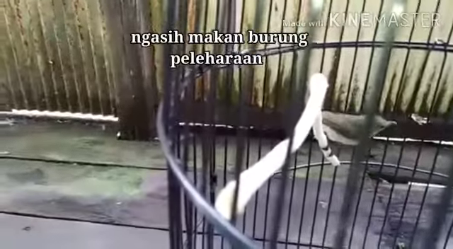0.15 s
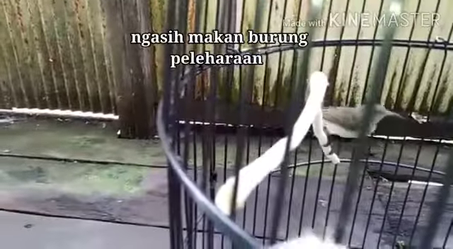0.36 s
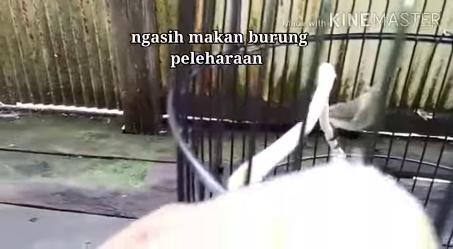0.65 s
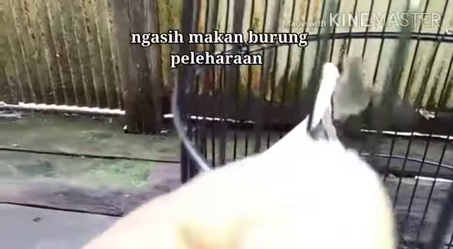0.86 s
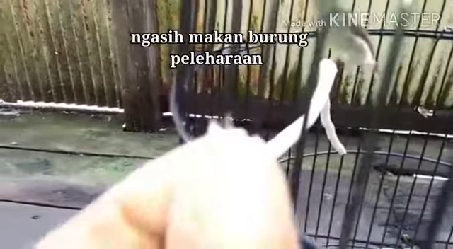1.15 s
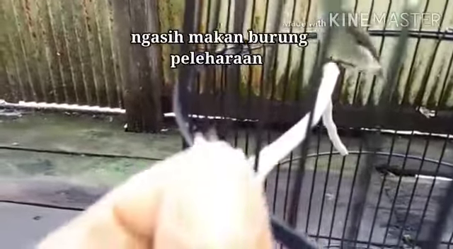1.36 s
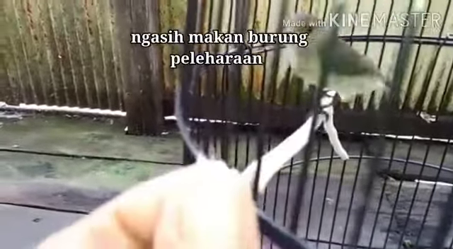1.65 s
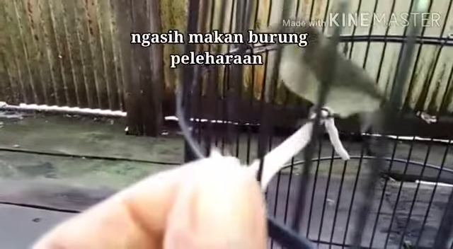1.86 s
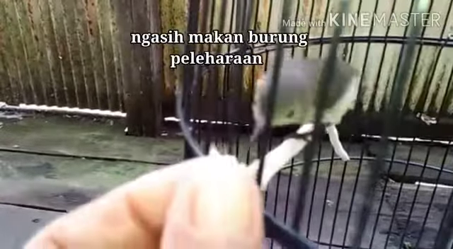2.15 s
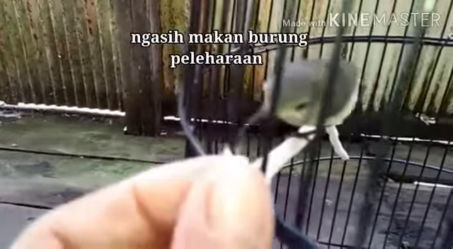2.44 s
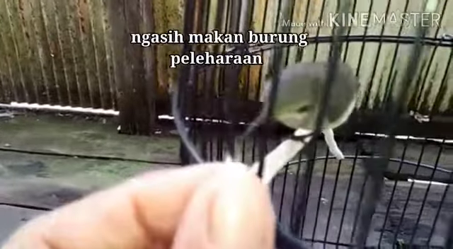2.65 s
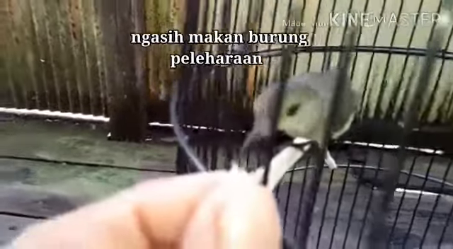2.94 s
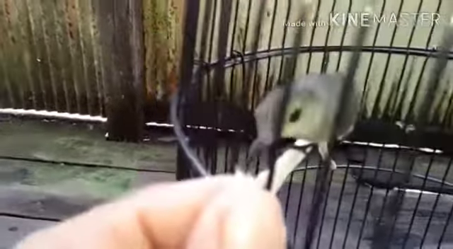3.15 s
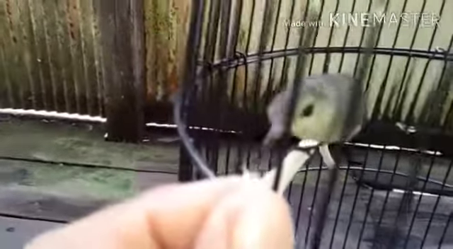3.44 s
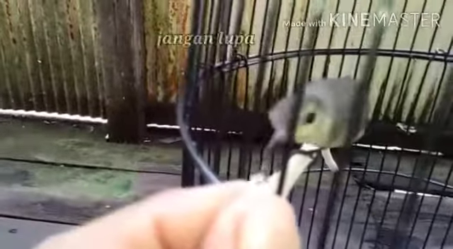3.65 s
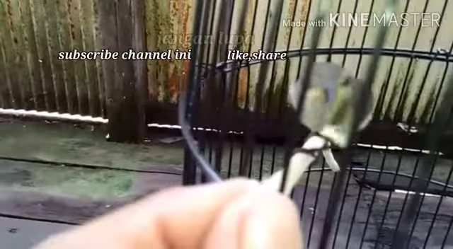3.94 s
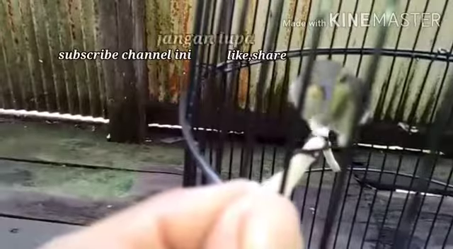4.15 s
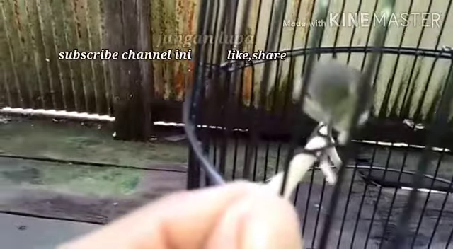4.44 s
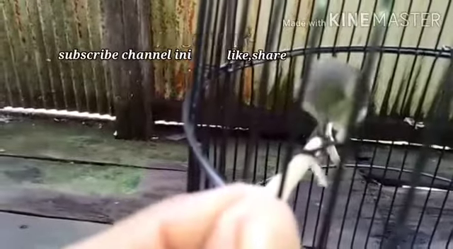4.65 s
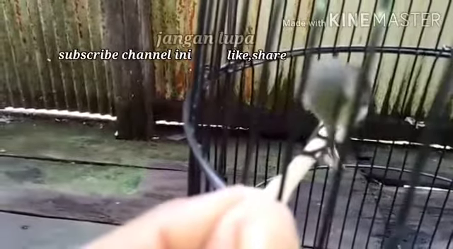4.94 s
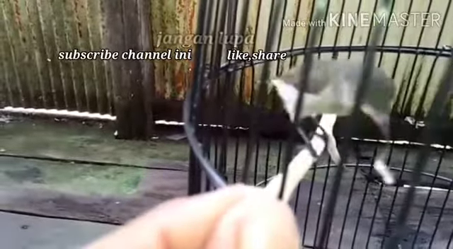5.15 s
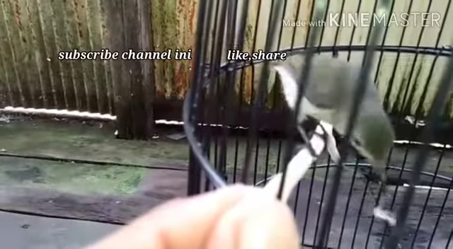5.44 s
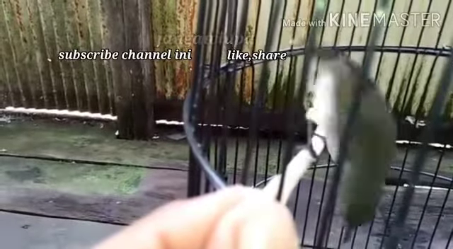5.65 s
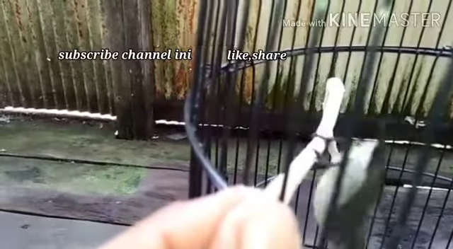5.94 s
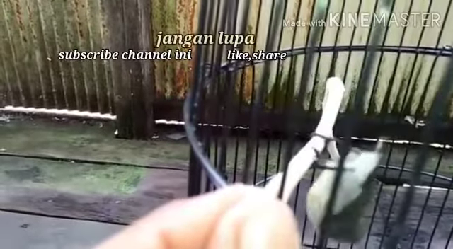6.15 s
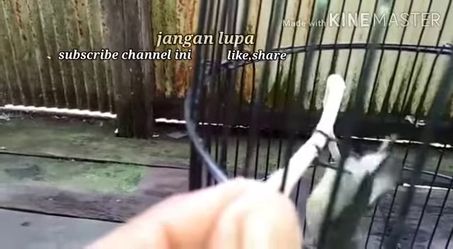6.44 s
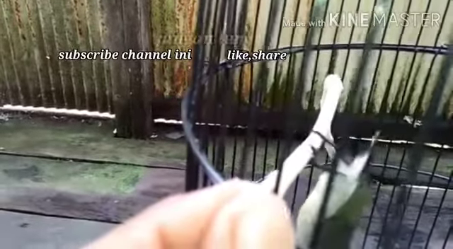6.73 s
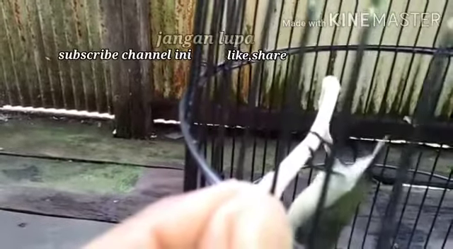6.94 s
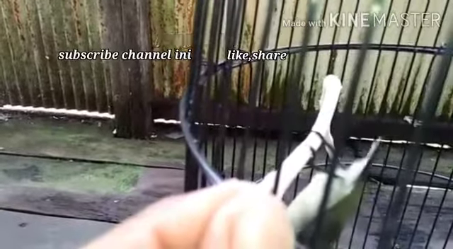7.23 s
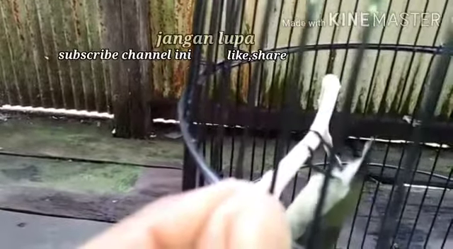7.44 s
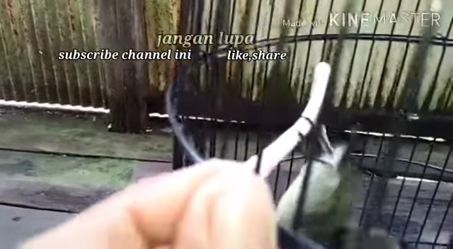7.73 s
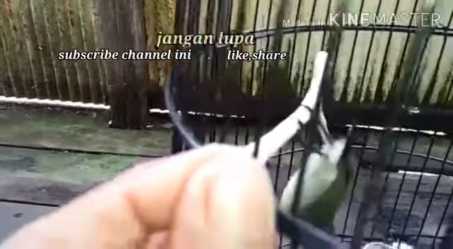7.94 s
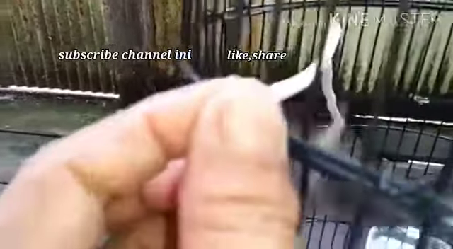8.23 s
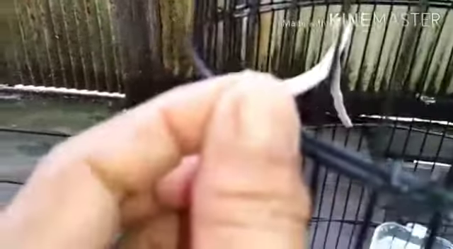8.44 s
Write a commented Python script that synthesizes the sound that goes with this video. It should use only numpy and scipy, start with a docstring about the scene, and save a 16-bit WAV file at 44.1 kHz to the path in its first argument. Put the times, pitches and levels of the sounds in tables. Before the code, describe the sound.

A small close bird gives sharp, very high chips and quick double ticks over faint street rumble, with an engine puttering by late.

```python
"""Caged songbird on a walled porch

A close bird gives harsh chips (arched tones with hiss), pure double ticks, nasal cheeps (throat-filtered
overtones), two-voiced cheeps (sum tones) and a thin held squeak; its hops are scratches of noise. Warbling
whistles, mostly of birds further off, and a few plain cheeps sound over a street of coloured noise and a whirr
that sinks in pitch; dull low bumps thud now and then. Late on an engine, a slowing train of pops ringing an
exhaust, putters by."""
import sys
import numpy as np
from scipy import signal
from scipy.fft import rfft, irfft
from scipy.io import wavfile

SR = 44100
rng = np.random.default_rng(int(sys.argv[2]) if len(sys.argv) > 2 else 0)


def file_out(sig):
    """Save sig as 16-bit WAV at sys.argv[1]."""
    # one column per channel
    cols = np.atleast_2d(sig).T
    # limit, then scale
    lim = np.clip(cols, -1, 1)
    pcm = np.round(lim * 32767).astype(np.int16)
    wavfile.write(sys.argv[1], SR, pcm)


N = 378378
TIME = np.arange(N) / SR   # seconds

# Levels in the tables are relative within each source.
# Street traffic. Each row: time in seconds, level in dB.
STREET_LEVEL = [(0, -70.5), (7.84, -60.5), (8.58, -64.5)]
# Colours of the low rumble, the traffic wash and the faint hiss. Each row: frequency in Hz, gain in dB.
RUMBLE_COLOUR = [(24, -6.5), (80, 2), (160, -6.5), (230, -18.5)]
TRAFFIC_COLOUR = [(200, -15.5), (287, 1.5), (360, -13), (420, -0.5), (600, -7), (960, -0.5), (1300, -7.5),
                  (1650, -5), (3000, -13)]
HISS_COLOUR = [(2500, 0.5), (4500, -10.5), (7000, -4), (9000, 2.5), (14500, -15)]
# Dull bumps. Each row: start in seconds, level in dB.
BUMP_EVENTS = [(5.039, -46), (5.138, -41.5), (5.328, -43), (6.818, -39.5)]
# Engine. Each row: time in seconds, firings per second, level in dB.
ENGINE_COURSE = [(3.9, 35, -70), (4.3, 35, -62), (6.2, 33, -59.5), (6.72, 28.8, -46.5), (7.15, 27.3, -51),
                 (7.75, 26.2, -56), (8.2, 23.7, -60), (8.58, 23, -53)]
# Exhaust resonances. Each row: frequency in Hz, width in Hz, gain in dB.
EXHAUST_MODES = [(68.4, 8.3, 3.5), (119, 17, 9.5), (165, 20, 1.5), (266, 33, -6.5)]
# Whistles, mostly of birds further off, with a few plain, weakly overtoned cheeps. Each row: start in
# seconds, length in seconds, middle pitch in Hz, fall in octaves (negative rises), level in dB.
WHISTLE_CALLS = [(1.194, 0.02, 4850, .03, -53), (1.78, 0.73, 3050, 0.2, -59), (1.89, .11, 4360, -.28, -52),
                 (2.09, 0.19, 1094, 0.12, -53.5), (2.382, 0.21, 2900, 0.63, -51),
                 (3.032, 0.079, 2160, 0.047, -47), (3.444, 0.18, 1187, -0.18, -52),
                 (3.582, 0.065, 2520, 0.25, -50.5), (3.681, 0.049, 5400, 0.55, -58.5),
                 (3.819, 0.1, 2910, -0.099, -49), (4.03, 0.15, 1902, -0.15, -51),
                 (4.076, 0.23, 2524, -0.16, -49.5), (4.148, .62, 1118, -.25, -57.5),
                 (4.882, .22, 1089, 0.089, -48.5), (4.984, 0.0583, 2978, 0.08, -34),
                 (5.057, .1, 5470, -0.034, -52), (6.987, 0.61, 1639, 0.032, -51.5),
                 (7.245, 0.1, 3350, 0.28, -53.5)]
# Feet and beak on perch and wires. Each row: time in seconds, level in dB.
TAP_EVENTS = [(1.584, -49.5), (1.754, -42), (1.849, -41.5), (1.945, -38), (2.728, -50), (3.797, -59),
              (4.161, -31), (5.706, -40.5), (6.447, -58), (6.746, -43), (7.167, -44)]
# Colour of those taps. Each row: frequency in Hz, gain in dB.
TAP_SPECTRUM = [(1700, -12.5), (2200, -0.5), (3600, -4.5), (5500, -0.5), (8600, 6.5), (13000, -10)]
# Partials of the squeak. Each row: frequency in Hz, level in dB.
SQUEAK_PARTIALS = [(9500, -4), (8300, -11.5), (13750, -13)]
# Resonance of throat and open beak. Each row: frequency in Hz, gain in dB.
THROAT_COLOUR = [(2000, -22.5), (3500, -9), (4600, -10), (6800, -1.5), (9000, 6.5), (11200, -10.5),
                 (14000, -16)]
# Nasal cheeps. Each row: start in seconds, length in seconds, top pitch in Hz, glide in octaves
# (positive rises), rasp from 0 to 1, brightness in dB per octave, level in dB.
CHEEP_CALLS = [(1.717, 0.031, 2430, 0.0071, 0.15, -13.5, -44.5),
               (1.815, 0.024, 3800, -0.19, 0.4, -10, -46.5), (1.914, 0.035, 4154, -.13, .15, 1.5, -34),
               (4.334, 0.062, 2365, -0.13, 0.4, -9, -46), (4.577, 0.097, 2358, 0.089, 0.14, -9, -39),
               (5.35, 0.029, 3646, 0.076, 0.42, 4, -29.5), (5.471, 0.045, 3377, -0.055, 0.37, -3, -41),
               (5.663, 0.027, 2710, 0.028, 0.84, 4, -43), (5.794, 0.021, 2610, 0.19, 0.95, 5, -32.5),
               (6.7, 0.028, 1962, -0.03, 0.4, 0.5, -41.5), (6.81, 0.029, 3550, 0.098, 0.29, 3, -33.5),
               (7.127, 0.028, 3796, -0.058, 0.22, 2, -38), (8.022, 0.061, 1744, -0.047, 0.51, 5, -42.5),
               (8.177, 0.037, 3940, -0.45, 0.4, -29, -46), (8.324, 0.07, 2125, -0.055, 0.49, -9.5, -45),
               (8.436, 0.067, 3620, -0.26, 0.34, -1, -41.5)]
# Two-voiced cheeps. Each row: start in seconds, length in seconds, top pitch of the high voice in Hz,
# its glide in octaves, start and end pitch of the low voice in Hz, rasp from 0 to 1, level in dB.
DUET_CALLS = [(2.894, 0.048, 4737, 0.087, 1850, 2190, 0.18, -27),
              (3.016, 0.066, 4770, -0.15, 1570, 2233, 0.23, -30.5),
              (3.143, .057, 4483, 0.15, 1700, 2330, 0.16, -30.5),
              (3.377, 0.07, 4526, 0.077, 1737, 2020, 0.18, -32.5)]
# Sum tones of the two voices, in dB. Each row: 0, 1 or 2 times the high voice (by row),
# with columns adding 0, 1 and 2 times the low voice; the first entry is silent.
SUM_TONES = [(-40, -29, -35), (-7.5, 6.5, -5), (4.5, 0.5, -16)]
# Double ticks. Each row: start in seconds, gap in seconds, first and second top pitch in Hz,
# rise of the second in octaves, level of the first and of the second in dB.
TICK_CALLS = [(4.216, 0.039, 8930, 8660, 0.019, -25.5, -21.5),
              (4.437, 0.047, 10200, 10580, 0.063, -25, -13.5),
              (4.829, .041, 10370, 10150, 0.36, -17.5, -12.5),
              (5.088, 0.044, 10090, 9780, 0.34, -18.5, -14)]
# Sharp chips. Each row: start in seconds, length in seconds, top pitch in Hz, closing fall in octaves,
# rasp from 0 to 1, level in dB.
CHIP_CALLS = [(0.314, .021, 6950, 0.42, 0.09, -20.5), (.429, .026, 7050, 0.23, 0.17, -17.5),
              (2.302, 0.028, 7800, 0.26, 0.07, -16.5), (2.43, 0.036, 7170, 0.28, 0.12, -19.5),
              (5.967, .023, 7240, .33, 0.17, -20), (6.125, 0.022, 6130, 0.28, 0.25, -21.5),
              (7.652, 0.04, 7330, 0.43, .08, -21.5)]
# Reflections off floor, wall and roof. Each row: delay in seconds, gain in dB.
PORCH_ECHOES = [(.0023, -13.5), (.0052, -10.5), (.0091, -9)]


def from_db(db):
    """A level in decibels is twenty times the logarithm of the amplitude ratio."""
    return 10 ** (np.asarray(db) / 20)


def rms_one(x):
    """Dividing by the root mean square gives a signal unit power."""
    return x / np.sqrt(np.mean(x ** 2) + 1e-20)


def in_time(rows):
    """Linear interpolation turns each column of a timed table into a curve."""
    s, *columns = np.transpose(rows)
    return [np.interp(TIME, s, column) for column in columns]


def gain_at(points, hz):
    """A spectral envelope is interpolated in dB over log frequency."""
    point_hz, db = np.transpose(points)
    return from_db(np.interp(np.log(hz), np.log(point_hz), db))


def add(out, s, sound):
    """By superposition, a sound starting at s seconds is summed into the mix."""
    i = max(0, int(s * SR))
    out[i:i + len(sound)] += sound[:max(0, N - i)]


def drift(rate, size):
    """Joining Gaussian values, rate per second, by straight lines gives a random wander."""
    at = np.arange(size) * rate / SR
    knots = rng.standard_normal(size // 4 + 2)
    return np.interp(at, np.arange(len(knots)), knots)


def phase_of(hz):
    """Phase is the running integral of frequency."""
    return 2 * np.pi * np.cumsum(hz) / SR


def lowpass(x, order, hz):
    """A Butterworth filter removes treble without ripple in the passband."""
    return signal.sosfilt(signal.butter(order, hz, fs=SR, output="sos"), x)


def bin_hz():
    """The Fourier bins are evenly spaced in frequency; the lowest is raised to 1 Hz."""
    return np.maximum(np.arange(N // 2 + 1) * SR / N, 1)


def noise(spectrum):
    """Spectral shaping colours white noise, falling steeply beyond the end points; rms 1."""
    hz = bin_hz()
    low_end = 1 / (1 + (spectrum[0][0] / hz) ** 8)
    high_end = 1 / (1 + (hz / spectrum[-1][0]) ** 8)
    white = rfft(rng.standard_normal(N))
    return rms_one(irfft(white * gain_at(spectrum, hz) * low_end * high_end, N))


def patchy(spectrum, depth_db, count=7):
    """Independent modulation makes sixth-octave bands, in count groups, swell and fade; rms 1."""
    group = np.floor(6 * np.log2(bin_hz())) % count
    colour = rfft(noise(spectrum))
    return rms_one(sum(irfft(colour * (group == k), N) * from_db(depth_db * drift(9, N))
                       for k in range(count)))


def resonate(x, hz, width_hz):
    """A pole pair near the unit circle rings at its frequency, with peak gain 1."""
    r = np.exp(-np.pi * width_hz / SR)
    zeros = np.array([1, 0, -1]) * (1 - r * r) / 2
    poles = [1, -2 * r * np.cos(2 * np.pi * hz / SR), r * r]
    return signal.lfilter(zeros, poles, x + 1e-18)


def scatter(x, t60, delay):
    """Dense reflections act as decaying noise of unit energy; t60 (s) is the time to fall 60 dB."""
    t = TIME[:SR]
    response = rng.standard_normal(SR) * from_db(-60 * t / t60) * (t > delay)
    return signal.fftconvolve(x, response / np.sqrt(np.sum(response ** 2)))[:N]


def hiss_swell(under_street_db=-1.5, rustle_db=-51, rustle_s=0.05, tap_share=0.94):
    """Powers add: a floor following the street, plus a swell around every tap."""
    floor = from_db(in_time(STREET_LEVEL)[0] + under_street_db)
    swells = 0
    for s, db in TAP_EVENTS:
        # tap_share of the tap's level in dB is passed on to the swell
        swell = from_db(rustle_db + tap_share * db) * np.exp(-np.abs(TIME - s) / rustle_s)
        swells = swells + swell ** 2
    return np.sqrt(floor ** 2 + swells)


def street(rumble_db=-65):
    """Incoherent noises add in power: rumble, traffic wash, decaying bumps and a faint hiss."""
    rumble = from_db(rumble_db + 3.5 * drift(14, N)) * patchy(RUMBLE_COLOUR, depth_db=3)
    wash = from_db(in_time(STREET_LEVEL)[0] + 5.5) * patchy(TRAFFIC_COLOUR, depth_db=5)
    bumps, t = np.zeros(N), TIME[:SR // 4]
    for s, db in BUMP_EVENTS:
        onset = 1 - np.exp(-t / 0.00078)
        add(bumps, s, from_db(db - 60 * t / 0.37) * onset)   # falls 60 dB in 0.37 s
    hiss = hiss_swell() * from_db(2.5 * drift(12, N)) * noise(HISS_COLOUR)
    return rumble + wash + bumps * noise(RUMBLE_COLOUR) + hiss


def whirr(peak_s=4.26, attack_s=0.077, halves_s=1.08, peak_db=-48.5, idle_db=-73.5):
    """Modulating low noise onto a carrier gives a band about its pitch, which sinks as it recedes."""
    age = np.maximum(TIME - peak_s, 0)
    centre_hz = 2164 - 200 * age   # sinks 200 Hz per second
    attack = np.clip(1 + (TIME - peak_s) / attack_s, 0, 1) ** 2
    fading = 1 / (1 + age / halves_s)   # half strength after halves_s
    gain = np.hypot(from_db(idle_db), from_db(peak_db) * attack * fading)
    spread = [(10, -6.5), (170, -0.5), (400, -16.0), (900, -20.0)]   # (Hz from the centre, dB)
    above = signal.hilbert(patchy(spread, depth_db=6))
    below = signal.hilbert(patchy(spread, depth_db=6))
    carrier = np.exp(1j * phase_of(centre_hz))
    return gain * np.real(above * carrier + below / carrier) / np.sqrt(2)


def engine(muffler_hz=380, boom_db=4, boom_below_rate=31.43, boom_onset_rate=0.74):
    """Each firing excites the exhaust modes; muffler and distance dull them, and the third order booms."""
    rate, level_db = in_time(ENGINE_COURSE)
    phase = phase_of(rate * (1 + .008 * drift(25, N)))
    firings = np.diff(np.floor(phase / (2 * np.pi)), prepend=0)   # one impulse per cycle
    firings = firings * from_db(1.5 * drift(30, N))
    pipe = sum(from_db(db) * resonate(firings, hz, width) for hz, width, db in EXHAUST_MODES)
    pipe = lowpass(pipe, 3, muffler_hz)
    pops = rms_one(pipe + scatter(pipe, t60=0.34, delay=0))   # house fronts smear the pops
    boom = np.sqrt(2) * np.cos(3 * phase) * from_db(2 * drift(18, N))
    # the boom sets in as the firings per second drop below boom_below_rate
    labouring = (1 + np.tanh((boom_below_rate - rate) / boom_onset_rate)) / 2
    return from_db(level_db) * (pops + from_db(boom_db) * labouring * boom)


def whistles():
    """Frequency modulation of a glide gives a warble; weak second and third harmonics colour it."""
    out = np.zeros(N)
    for s, length, middle_hz, fall, db in WHISTLE_CALLS:
        size = int(length * SR)
        sag = fall * np.linspace(-.5, .5, size)   # octaves
        phase = phase_of(middle_hz * 2 ** -sag * (1 + .022 * drift(130, size)))
        swell = signal.windows.tukey(size, .5) * from_db(3.5 * drift(35, size))
        tone = np.sin(phase) + from_db(-26.5) * (np.sin(2 * phase) + np.sin(3 * phase))
        add(out, s, from_db(db) * np.sqrt(2) * tone * swell)
    return out


def taps(t60=0.16, level_db=-3):
    """Friction of claws is a short burst of coloured noise, decaying 60 dB in t60 seconds."""
    push, t = np.zeros(N), TIME[:SR // 8]
    for s, db in TAP_EVENTS:
        onset = (1 - np.exp(-t / .004)) ** 2
        add(push, s - .002, from_db(db + level_db - 60 * t / t60) * onset)
    return push * noise(TAP_SPECTRUM) * from_db(3.6 * drift(700, N))


def squeak(start_s=0.064, attack_s=0.11, hold_s=0.21, release_s=0.036, level_db=-51):
    """Independently wavering partials add to a thin note that swells, holds and stops."""
    tones = sum(from_db(db) * np.sin(phase_of(hz * (1 + 0.006 * drift(252.6, N))))
                for hz, db in SQUEAK_PARTIALS)
    swell = np.interp(TIME, np.cumsum([start_s, attack_s, hold_s, release_s]), [0, 1, 1, 0])
    return np.sqrt(2) * from_db(level_db) * swell * tones


def arch(length, start_hz, top_hz, end_hz, crest, edge):
    """Tension sets pitch: the syrinx tightens to a crest, then lets go; a larger edge is softer."""
    u = np.linspace(0, 1, int(length * SR))
    crest = np.clip(crest, .1, .9)   # share of the length
    tightening = (start_hz - top_hz) * (1 - u / crest) ** 2
    letting_go = (end_hz - top_hz) * np.sin(np.pi / 2 * (u - crest) / (1 - crest)) ** 2
    hz = top_hz + np.where(u < crest, tightening, letting_go)
    return hz, np.abs(np.sin(np.pi * u)) ** edge


def cheep_arch(length, top_hz, glide, least_sag=0.024):
    """The crest follows the glide: late when rising, early when falling; both ends sag (octaves)."""
    up, down = np.maximum([glide, -glide], 0) + least_sag
    crest = 0.14 + .55 * up / (up + down)
    return arch(length, top_hz / 2 ** up, top_hz, top_hz / 2 ** down, crest=crest, edge=1.05)


def cheeps(second_db=-1, second_ratio=.93, rasp_above_hz=3600):
    """Source and filter: the throat picks out overtones of a lower, unsteady pitch."""
    out, orders = np.zeros(N), np.arange(1, 8)[:, None]
    highpass = signal.butter(4, rasp_above_hz, "high", fs=SR, output="sos")
    hiss = signal.sosfilt(highpass, noise(THROAT_COLOUR))
    for s, length, top_hz, glide, rasp, bright_db, db in CHEEP_CALLS:
        hz, swell = cheep_arch(length, top_hz, glide)
        size = len(hz)
        phase = phase_of(hz * (1 + (0.0087 + 0.046 * rasp) * drift(600, size)))
        strength = from_db(bright_db * np.log2(orders)) * gain_at(THROAT_COLOUR, orders * hz)
        strength = strength * (orders * hz < SR / 2)
        # in raspy calls the other side of the syrinx joins in, a little flat
        other_side = from_db(second_db) * rasp * np.sin(orders * second_ratio * phase)
        voice = np.sum(strength * (np.sin(orders * phase) + other_side), axis=0)
        tone = rms_one(voice) * from_db(1.8 * drift(450, size))
        breath = rasp * hiss[int(s * SR):][:size]
        add(out, s, from_db(db - 3.5) * swell * (tone + breath))
    return out


def duets(high_jitter=0.089, low_jitter=0.32, flutter_db=3, breath=1.0, level_db=-4.0):
    """Two independent sides of the syrinx mix into sum tones; the call roughens as it goes."""
    out, hiss = np.zeros(N), noise([(5000, -18), (8500, 19), (14000, -4)])   # (Hz, dB)
    for s, length, top_hz, glide, low_start_hz, low_end_hz, rasp, db in DUET_CALLS:
        high_hz, swell = cheep_arch(length, top_hz, glide)
        size = len(swell)
        low_hz = np.linspace(low_start_hz, low_end_hz, size)
        rough = rasp * np.linspace(.4, 1.6, size)
        high = phase_of(high_hz * (1 + high_jitter * rough * drift(903, size)))
        low = phase_of(low_hz * (1 + low_jitter * rough * drift(905, size)))
        tone = np.zeros(size)
        for m, row in enumerate(SUM_TONES):
            for n, tone_db in enumerate(row):
                tone += from_db(tone_db + flutter_db * drift(299, size)) * np.sin(m * high + n * low)
        rasping = breath * rough * hiss[int(s * SR):][:size]
        add(out, s, from_db(db + level_db) * swell * (rms_one(tone) + rasping))
    return out


def ticks(level_db=-3.07, jitter=0.0024, edge=0.61):
    """Lone sinusoids are pure: a round arch, then a quicker tick that rises to a late crest and dips."""
    out = np.zeros(N)
    for s, gap, first_hz, second_hz, rise, first_db, second_db in TICK_CALLS:
        ends_hz = .85 * first_hz
        lead = arch(0.0205, ends_hz, first_hz, ends_hz, crest=0.575, edge=edge)
        # the second tick rises little or much, by pair
        main = arch(0.0136, second_hz / 2 ** rise, second_hz, 0.88 * second_hz, crest=0.8, edge=edge)
        for start, db, (hz, swell) in ((s, first_db, lead), (s + gap, second_db, main)):
            tone = np.sin(phase_of(hz * (1 + jitter * drift(1215, len(hz)))))
            add(out, start, from_db(db + level_db) * swell * tone)
    return out


def chips(jitter=0.035, flutter_db=3, rush_s=0.008, rush_at=0.29):
    """A fast arched tone with a weak octave is joined by turbulent hiss, which makes it harsh."""
    out = np.zeros(N)
    hiss = noise([(4300, -4), (5800, -1.5), (9000, 4.0), (12000, -7.0), (14500, -12.5)])   # (Hz, dB)
    for s, length, top_hz, fall, rasp, db in CHIP_CALLS:
        hz, swell = arch(length, .85 * top_hz, top_hz, top_hz / 2 ** fall, crest=.3, edge=0.32)
        size = len(hz)
        phase = phase_of(hz * (1 + jitter * drift(1200, size)))
        tone = np.sqrt(2) * (np.sin(phase) + from_db(-22.5) * np.sin(2 * phase))
        add(out, s, from_db(db - 7) * swell * tone * from_db(flutter_db * drift(450, size)))
        # the hiss builds up before the tone catches and dies away after it
        t = np.arange(-SR // 20, SR // 20) / SR
        rush = hiss[int(s * SR):][:len(t)] / np.cosh(t / rush_s)
        add(out, s + rush_at * length + t[0], from_db(db + 1.0) * rasp * rush)
    return out


def porch(x, early_db=-7, tail_db=-16):
    """Discrete reflections lead into a quick scatter, then a longer tail that has lost its top."""
    echoes = sum(from_db(db) * np.interp(TIME - delay, TIME, x, left=0) for delay, db in PORCH_ECHOES)
    early = from_db(early_db) * scatter(x, t60=0.14, delay=0.009)
    tail = from_db(tail_db) * scatter(lowpass(x, 2, 9000), t60=0.4, delay=0.052)
    return x + echoes + early + tail


def scene():
    """Sources superpose: the close bird in the porch's echoes, whistles, street, whirr and engine."""
    background = street() + whirr() + engine()
    direct = whistles()
    # the whistles hold more scattered than direct sound
    whistling = from_db(-5) * (.55 * direct + 1.25 * scatter(direct, t60=.4, delay=0))
    bird = from_db(5.5) * porch(taps() + squeak() + cheeps() + duets() + ticks() + chips())
    return (background + whistling + bird)[None]


def record(dry):
    """An elliptic lowpass cuts the top steeply, above 14350 Hz."""
    return signal.sosfilt(signal.ellip(10, .2, 70, 14350, fs=SR, output="sos"), dry)


dry = scene()
out = record(dry)
file_out(out)
```